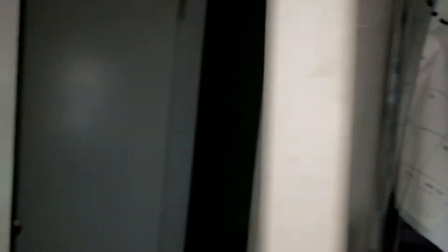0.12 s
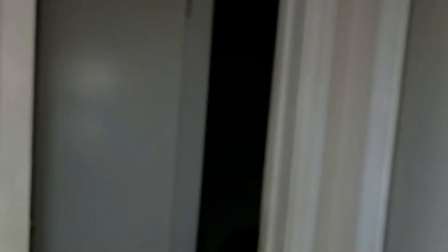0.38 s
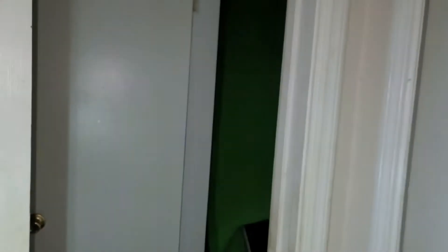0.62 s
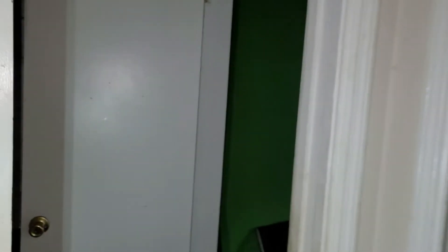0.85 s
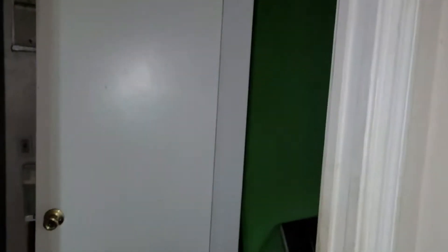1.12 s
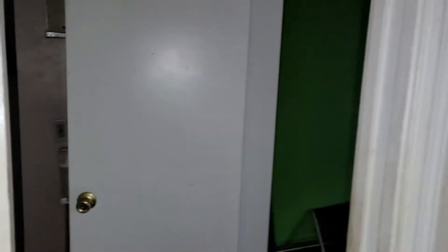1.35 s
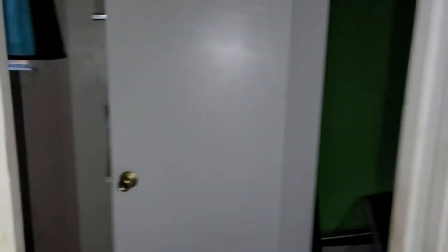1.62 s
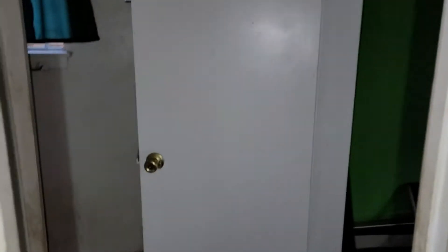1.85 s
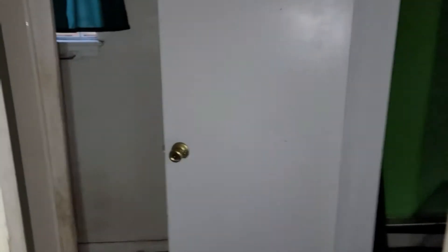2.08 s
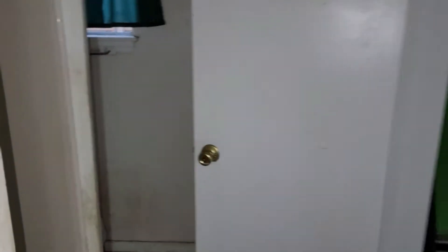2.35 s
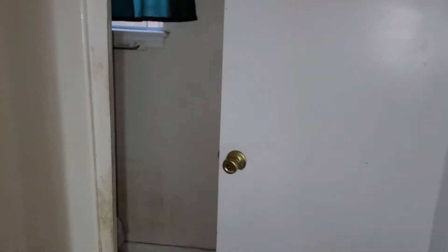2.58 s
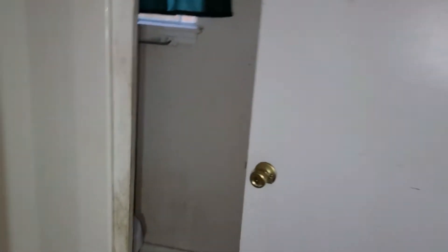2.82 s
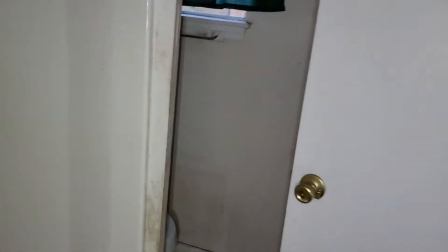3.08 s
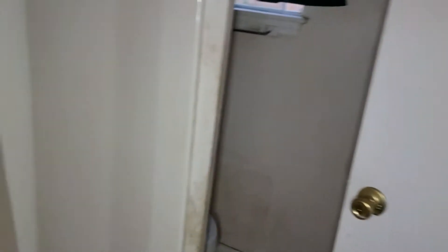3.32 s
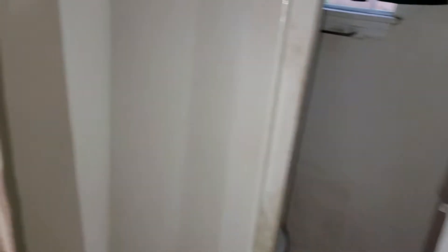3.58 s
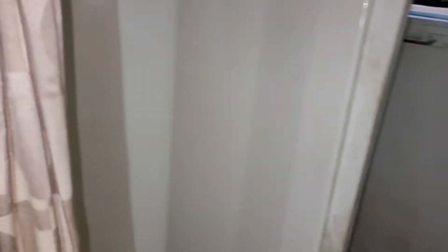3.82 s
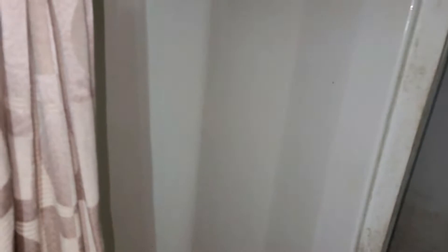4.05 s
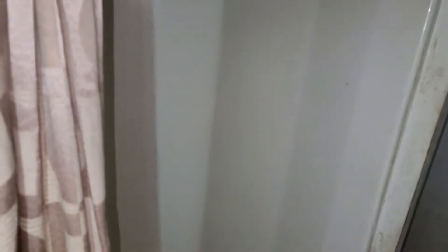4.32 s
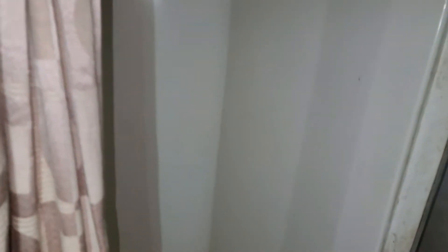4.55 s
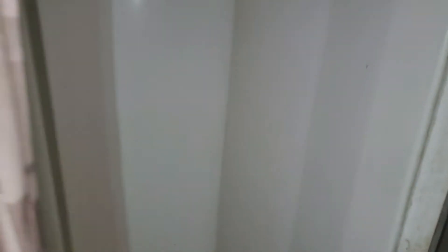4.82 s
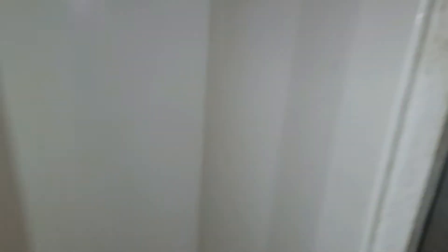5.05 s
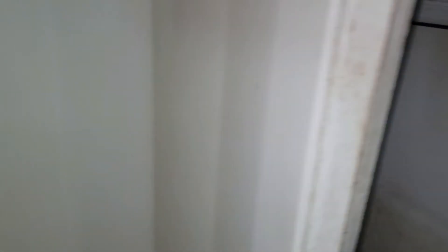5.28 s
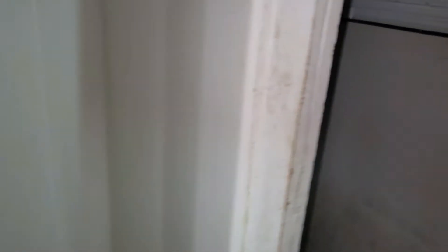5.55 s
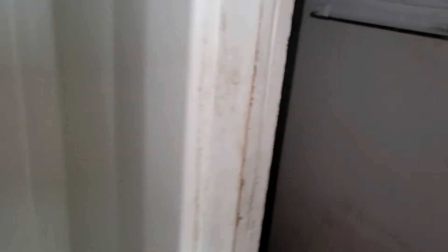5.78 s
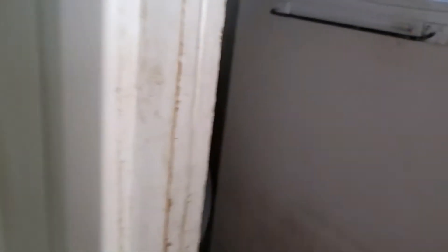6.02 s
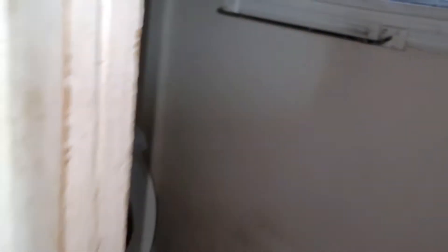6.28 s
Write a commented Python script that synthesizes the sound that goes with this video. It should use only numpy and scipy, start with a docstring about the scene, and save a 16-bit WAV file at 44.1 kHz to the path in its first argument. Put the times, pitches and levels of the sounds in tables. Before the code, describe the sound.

In small, hard-walled empty rooms, a quiet low mains hum sits under soft sole scuffs and crisp ticks. A hollow door gives a deep, soft boom early on. Light steps and rustling follow as the hum fades. After a near-quiet lull, one violent wooden heel thump with a sharp crack dominates, ringing briefly, then a smaller cluster of knocks. Close stereo handheld microphone.

```python
"""Small bare rooms: someone walks through, heels thump the boards, soles scuff and tick, a door panel booms.
Boards and door are banks of dying sines driven by short pushes; ticks are filtered clicks with grit.
Clothes, soles, rumble and room tone are shaped noise; squeaks are wavering sines; hum is two sines.
The hum fades as the appliance is left behind, and hard walls ring briefly after thumps and ticks."""
import sys
import numpy as np
from scipy import signal
from scipy.fft import rfft, irfft
from scipy.io import wavfile
from scipy.ndimage import uniform_filter1d

SR = 44100
rng = np.random.default_rng(int(sys.argv[2]) if len(sys.argv) > 2 else 0)


def natural_amplitude(level_db):
    """Convert a level in decibels to a linear amplitude factor, elementwise."""
    exponent = np.asarray(level_db, float) / 20
    return 10 ** exponent


def transcribe(u):
    """Save the signal u as a 16-bit wav file named by the first command-line argument.

    u: samples, shape (n,) or (channels, n), limited to [-1, 1]; the rate is SR.
    q: integer samples, one column per channel.
    """
    v = np.clip(np.atleast_2d(u).T, -1, 1)
    q = np.round(v * 32767).astype(np.int16)
    wavfile.write(sys.argv[1], SR, q)


N = 282240  # samples, 6.4 s

# appliance hum, nearest early on, then left behind: start_s, level_db (rms of the fundamental)
HUM_LEVEL = [(0, -51), (1.5, -46.5), (2.8, -50.5), (3.6, -55), (4.0, -62), (4.4, -58), (4.8, -69.5),
             (6.4, -62)]
# spectrum of the low rumble: freq_hz, density_db (relative, per Hz)
RUMBLE_COLOUR = [(15, -0.5), (35, 8.5), (60, 13.5), (100, -28.5), (160, -44.5), (300, -42.5)]
# house structure rumbling as the walker shifts weight: peak_s, length_s, peak_db (rms at the peak)
SWAYS = [(0, .6, -57), (0.823, .7, -50), (1.45, .8, -53.5), (2.898, .8, -51), (3.295, .4, -62),
         (3.635, .4, -47.5), (4.6, .9, -55), (5.25, .8, -59.5), (6.4, .7, -44)]
# spectrum of the quiet room tone: freq_hz, density_db (relative, per Hz)
TONE_COLOUR = [(47, -33), (80, 5), (152, -11), (227, -6.5), (378, -15.5), (687, -9), (958, -15.5),
               (1490, -14.5), (2490, -25), (6590, -33), (16000, -64)]
# likeness of left and right in diffuse sound: freq_hz, correlation (-1 to 1)
LIKENESS = [(60, .98), (170, .95), (350, .4), (700, -.3), (1400, -.35), (3000, -.05), (8000, .05)]
# how long hard walls ring: freq_hz, t60_s
WALLS = [(60, .4), (250, 0.47), (1000, 0.28), (3000, 0.28), (6000, 0.25), (10000, 0.28), (15000, 0.1)]
# faint short squeaks and rings: start_s, length_s, pitch_hz, level_db (3 dB above the plain sine's peak)
SQUEAKS = [(0.489, 0.27, 747, -55), (1.257, 0.048, 3150, -46.5), (3.472, 0.033, 2500, -43),
           (4.218, .11, 1880, -58), (4.712, 0.026, 2320, -43), (4.713, 0.039, 3950, -54.5),
           (6.066, 0.048, 1650, -32)]
# spectrum of brushing cloth and soles: freq_hz, density_db (relative, per Hz)
SCUFF_COLOUR = [(71, -37), (120, -16.5), (256, -7), (284, -10.5), (454, -6), (503, -5.5), (670, -5.5),
                (1120, -7.5), (1830, -11.5), (2240, -15), (6240, -29), (16000, -60.5)]
# clothes rustling with the pace of the walk: start_s, level_db (before tilt and flicker)
RUSTLE = [(0, -56), (1.25, -60.5), (1.95, -61.5), (2.45, -67), (3.05, -61), (3.42, -62), (3.8, -62.5),
          (4.3, -79), (4.9, -58.5), (5.42, -77), (5.9, -64.5), (6.4, -54)]
# soles dragging on the floor: peak_s, length_s, peak_db (before tilt and flicker), tilt_db (per octave)
SCUFFS = [(0.133, 0.38, -54, -1.5), (0.317, 0.2, -49, 0.7), (0.889, 0.15, -47, -3), (1.12, 0.38, -52, 1.2),
          (1.581, 0.15, -49.5, 2.5), (2.123, 0.2, -57, 3.5), (2.686, 0.21, -57.5, 1.5),
          (2.84, 0.1, -53.5, -0.5), (3.15, 0.19, -55.5, -3), (3.494, 0.041, -51.5, -1),
          (3.522, 0.078, -48.5, -3), (3.594, 0.15, -41, -0.5), (3.622, 0.044, -41, 0.9),
          (4.516, 0.1, -61, -3.5), (4.59, 0.18, -56, 3.5), (5.22, 0.38, -58, 1.5),
          (5.49, 0.063, -56.5, 1.5), (6.176, 0.076, -45.5, -7.5), (6.31, 0.058, -43.5, -4.8),
          (6.38, 0.21, -59.5, -8)]
# sole slaps, grit and latch ticks: start_s, peak_db (touch before panning), centre_hz,
# spread_octaves (upward), room_db (send relative to the touch)
TICKS = [(0.1633, -36.5, 2190, 1.36, 10), (0.473, -43.5, 5870, 0.47, -15),
         (0.5853, -23.5, 5000, 0.47, -2.5), (0.594, -41, 7000, 1, -10.5), (0.8333, -22.5, 5000, 0.85, -1.5),
         (1.08, -37, 3000, 1, 0.1), (1.167, -46, 4230, 1.4, 5.5), (1.261, -47, 3160, 0.72, 5),
         (1.319, -36.5, 2910, 1.2, 1.5), (1.553, -39.5, 2600, 1.32, 12), (1.703, -45.5, 2350, 1.4, 14),
         (1.8144, -34.5, 3000, 1.4, 5.5), (2.054, -49.5, 3890, 0.88, 6), (2.842, -45.5, 2210, 1.4, 0.1),
         (2.942, -42.5, 4800, 0.77, -3), (3.037, -37.5, 4170, 0.93, 6.5), (3.1573, -39.5, 4020, 0.91, 3.5),
         (3.481, -56, 2700, 1.3, 6), (3.723, -23.5, 2550, 1, -0.8), (4.18, -58.5, 8000, 0.36, -11),
         (4.281, -47, 7300, 0.34, -1.5), (4.366, -70, 6500, 0.63, 0), (4.713, -41, 2100, 0.57, -1.5),
         (4.942, -37.5, 1390, 0.66, 7.5), (5.017, -9, 2520, 1.17, 6), (5.0188, -13.5, 2830, 0.77, -8),
         (5.1758, -42.5, 1380, .9, 5), (5.292, -52, 2280, 1.1, 1), (5.3539, -43, 5500, 0.96, 3.5),
         (5.9405, -41, 2450, 1.5, -0.5), (6.066, -29, 1480, 0.77, -0.5), (6.1423, -49.5, 2730, 1.08, 15.5),
         (6.1635, -39.5, 785, 1.34, -8), (6.197, -34, 6000, 0.66, -1), (6.2895, -37, 1990, 1.04, 13),
         (6.304, -42, 3000, 0.29, 3), (6.336, -37, 3600, 0.72, 4)]
# small stiff parts that colour the ticks: pitch_hz, width_hz, boost_db
TICK_RINGS = [(1583, 3300, 7.5), (2930, 570, 5.5), (5000, 1900, 2.5), (7000, 1100, 5.5), (11560, 600, 9.5)]
# heel blows on the boards: start_s, peak_db (before panning), centre_hz, spread_octaves, pan_db (left over right)
STEPS = [(0.166, -45, 829, 1.4, -12), (0.887, -35, 500, 0.69, 0.1), (0.905, -37, 420, 0.71, 6),
         (1.159, -43.5, 378, 0.71, 4), (1.552, -30, 229, 1.17, -4), (2.546, -54, 374, 0.63, 5),
         (2.673, -51, 307, 2.3, 0), (2.839, -39.5, 179, 1.9, 2), (3.161, -44.5, 475, 0.73, -4),
         (3.182, -44.5, 520, 0.5, 7), (3.497, -55, 703, 1.2, -2), (3.726, -32, 199, 1.6, 1),
         (4.528, -46, 285, 1.9, 2), (4.71, -52, 687, 1.1, 17), (4.802, -43.5, 420, 0.56, 2),
         (4.941, -12.5, 220, 1.47, 0.2), (4.951, -15, 201.6, 0.62, 4), (4.977, -28.5, 266, 0.97, 10),
         (5.018, -20, 150, 1.8, 2.5), (5.073, -39, 202, 2.3, 0), (6.066, -25.5, 268, 1.17, -0.5),
         (6.101, -36, 213, 1.5, -11), (6.159, -27.5, 350, 0.76, 2), (6.294, -32, 201, 0.56, 1)]
# body weight settling on the joists: start_s, peak_db, centre_hz
WEIGHT = [(0.596, -45, 51.7), (0.779, -51, 55.6), (2.899, -44, 60.4), (3.599, -48, 40), (3.719, -40, 45.7),
          (4.951, -20.5, 46), (5.028, -22.5, 60), (6.074, -26.5, 45.3), (6.122, -35, 41.8),
          (6.289, -40, 45)]
# modes of the boards: pitch_hz (before detuning), level_db, t60_s
BOARDS = [(27.7, -10, 0.26), (37.1, -2.5, 0.062), (49.5, -11, 0.17), (67, -46.5, .37), (94.6, -2.5, .25),
          (151, -4, 0.12), (163, -8, 0.14), (199, 6, 0.098), (244.3, -5, 0.13), (285, -1.6, .1),
          (350, -2.5, 0.062), (419.5, -6.5, 0.16), (481.4, -10.5, 0.19), (571, -3, 0.056),
          (675, -1.5, 0.097), (761, 2, 0.057), (862.6, -8, 0.29), (943, 3.5, 0.019), (1184, -8, 0.03),
          (1260, -1, 0.11), (1480, 10.5, .04), (1650, -18, .04), (1880, -14.5, .04)]
# soft push on the hollow door: start_s, peak_db, contact_ms
DOOR_BUMP = (1.541, -10, 7.7)
# modes of the door leaf: pitch_hz, level_db, t60_s
DOOR = [(60.5, 0, .4), (73.5, -4, .3), (92, -10, .15), (135, -20, .2), (172, -10, .2), (221, -8, .2),
        (296, -18, .3), (382, -12, .3), (490, -14, .3), (587, -12, .3)]


def evened(x):
    """Scales to rms 1."""
    return x / np.sqrt(np.mean(x ** 2) + 1e-20)


def read(points, hz):
    """Reads a spectrum table on a log-frequency axis."""
    f, value = np.transpose(points)
    return np.interp(np.log(hz + 1), np.log(f + 1), value)


def curve(rows, t):
    """Reads a time curve."""
    return np.interp(t, *np.transpose(rows))


def swell(t, s, length, db):
    """Power of a movement that peaks at s and is 12 dB down at both ends of its length."""
    rise_share, bend = 0.45, 1.42  # part of the length spent rising; roundness of the top
    way = (t - s) / length / np.where(t < s, rise_share, 1 - rise_share)
    return natural_amplitude(2 * (db - 12 * abs(way) ** bend))


def add(mix, s, sound):
    """Mixes a sound in at time s."""
    part = mix[..., round(s * SR):][..., :sound.shape[-1]]
    part += sound[..., :part.shape[-1]]


def sides(pan_db):
    """Gains for left and right."""
    return natural_amplitude(np.array([[pan_db / 2], [-pan_db / 2]]))


def diffuse(db_of, size, count=N):
    """Two-channel noise shaped by db_of(Hz, s), left and right as alike as in the sound field."""
    hop = size // 4
    frames = count // hop + 5
    hz = np.fft.rfftfreq(size, 1 / SR)[:, None]
    a, b, c, d = rng.standard_normal((frames, len(hz), 4)).T
    same = np.clip(read(LIKENESS, hz), -1, 1)
    left, other = a + 1j * b, c + 1j * d
    spectra = np.array([left, same * left + np.sqrt(1 - same ** 2) * other])
    spectra *= natural_amplitude(db_of(hz, np.arange(frames) * hop / SR))
    return signal.istft(spectra, nperseg=size, noverlap=size - hop)[1][:, :count]


def steady(colour, size, count=N):
    """Diffuse noise of one unchanging colour."""
    return diffuse(lambda hz, s: read(colour, hz) + 0 * s, size, count)


def room(x, low_hz):
    """Dense reflections from hard walls, each band dying at its own speed, weaker below low_hz."""
    def decay_db(hz, s):
        """Decay of each band, with the low end rolled off."""
        return -60 * s / read(WALLS, hz) - 10 * np.log10(1 + (low_hz / (hz + 1)) ** 2)

    t, out = np.arange(N) / SR, np.zeros((2, N))
    build_up = 1 - np.exp(-np.arange(SR // 2) / SR / 0.0013)
    for k in range(3):  # three tails take turns
        tail = diffuse(decay_db, 256, count=SR // 2) * build_up
        turn = np.sqrt(2 / 3) * np.cos(2 * np.pi * (3.1 * t + k / 3))
        out += signal.fftconvolve((x * turn)[None], tail / np.linalg.norm(tail[0]), axes=1)[:, :N]
    return out


def ports(x, lead_ms):
    """Direct sound reaches the right microphone port first, the left one lead_ms later."""
    return np.array([np.roll(x[0], round(lead_ms * SR / 1000)), x[1]])


def ring(modes, centre_hz, spread, detune):
    """Dying sines, weighted by a bell over log frequency where the blow puts its energy."""
    hz, db, t60 = np.transpose(modes)[:, :, None]
    t = np.arange(round(1.2 * t60.max() * SR)) / SR
    bell_db = -6 * (np.log2(hz / centre_hz) / max(spread, .2)) ** 2
    side = (-1.) ** np.arange(len(modes))[:, None]  # neighbouring modes start in opposite directions
    decay = natural_amplitude(db + bell_db - 60 * t / t60)
    return (side * decay * np.sin(2 * np.pi * hz * detune * t)).sum(0)


def struck(body, contact_ms, db):
    """A push that peaks a quarter of the contact time in, then relaxes, drives the body."""
    u = np.linspace(0, 8, max(round(2 * contact_ms * SR / 1000), 2))
    sound = signal.fftconvolve(body, u * np.exp(-u))
    return natural_amplitude(db) * sound / abs(sound).max()


def room_tone():
    """Quiet steady noise of the rooms at a fixed rms level."""
    return natural_amplitude(-58) * evened(steady(TONE_COLOUR, 1024))


def hum():
    """Mains hum: a 60 Hz sine and its weaker octave, both following the distance."""
    t = np.arange(N) / SR
    turn = 2 * np.pi * 60 * t
    return np.sqrt(2) * natural_amplitude(curve(HUM_LEVEL, t)) * (np.cos(turn) + natural_amplitude(-21.5) * np.sin(2 * turn))


def rumble():
    """Low structure noise at a resting level, swelling with each shift of weight."""
    rest_db = -59.5
    t = np.arange(N) / SR
    load = np.sqrt(natural_amplitude(2 * rest_db) + sum(swell(t, *row) for row in SWAYS))
    return load * evened(steady(RUMBLE_COLOUR, 2048))


def squeaks():
    """Brief, rough, unsteady tones that start quickly and fade as surfaces stick and slip."""
    dry = np.zeros(N)
    draws = rng.standard_normal((len(SQUEAKS), 2, SR // 4))
    for (s, length, hz, db), (slow, fast) in zip(SQUEAKS, draws):
        waver = 1 + 0.22 * uniform_filter1d(slow, 150)[:round(length * SR)]
        u = np.linspace(0, 1, len(waver))
        rough = evened(uniform_filter1d(uniform_filter1d(fast, size=80), size=80))
        chatter = 1 + 0.47 * rough[:len(u)]  # stick and slip
        tone = np.sin(2 * np.pi * np.cumsum(hz * waver) / SR)
        fade = np.minimum(u / 0.066, 1) * (1 - u)
        add(dry, s, natural_amplitude(db - 3) * chatter * tone * fade)
    return ports(np.array([dry, dry]), lead_ms=0.25)


def rustle_and_scuffs():
    """Brushing noise of clothes and dragged soles, in uneven rubs with gritty flicker."""
    rustle_tilt_db, rub_db, grit_db = 1.06, 1, 3  # tilt per octave
    grit = uniform_filter1d(np.minimum(rng.exponential(size=N // 64 + 5), 3.2) - 1, 2)
    rubs = evened(uniform_filter1d(rng.standard_normal(len(grit)), size=9))
    unit = np.std(steady(SCUFF_COLOUR, 256, count=SR))

    def field(hz, s):
        """Colour, tilt about 1.4 kHz, level and grit."""
        octaves = np.log2((hz + 100) / 1500)
        power = natural_amplitude(2 * (curve(RUSTLE, s) + rustle_tilt_db * octaves))
        for at, length, db, tilt_db in SCUFFS:
            power = power + swell(s, at, length, db) * natural_amplitude(2 * tilt_db * octaves)
        return read(SCUFF_COLOUR, hz) + 10 * np.log10(power) + rub_db * rubs + grit_db * grit

    return diffuse(field, 256) / unit


def ticks():
    """Short hard contacts: a firm touch and a spray of grit, coloured by the blow and small stiff parts."""
    downward = 1.24  # a tick spreads further down than up
    firm_db, deeper_per_db = -24, 1.5  # firmer blows reach deeper, octaves per dB
    dry, send = np.zeros((2, N)), np.zeros(N)
    hz = np.fft.rfftfreq(1024, 1 / SR) + 1
    grit_fade = natural_amplitude(-60 * np.arange(1024) / SR / 0.02)
    rings_db = sum(db / (1 + (2 * (hz - f) / width) ** 2) for f, width, db in TICK_RINGS)
    draws = rng.standard_normal((len(TICKS), 2, 1024))
    for (s, db, centre_hz, above, room_db), draw in zip(TICKS, draws):
        grit = natural_amplitude(-13.5) * draw * grit_fade  # scatters differently to each port
        below = downward * above + deeper_per_db * max(db - firm_db, 0)
        octaves = np.log2(hz / centre_hz) / np.where(hz > centre_hz, above, below)
        log_gain = np.log(natural_amplitude(np.maximum(rings_db - 6 * octaves ** 2, -60)))
        full = np.r_[log_gain, log_gain[-2:0:-1]]
        # minimum phase: nothing sounds before the touch
        causal = np.exp(np.conj(signal.hilbert(full)))[:len(hz)]
        touch = irfft(causal)
        gain = natural_amplitude(db) / abs(touch).max()
        add(dry, s, gain * (touch + irfft(rfft(grit) * causal)))
        add(send, s, gain * natural_amplitude(room_db) * touch)
    return ports(sides(-2.5) * dry, lead_ms=0.25) + room(send, low_hz=350)


def door_boom():
    """A soft push sets the modes of a hollow door leaf ringing."""
    dry = np.zeros(N)
    s, db, contact_ms = DOOR_BUMP
    panel = ring(DOOR, 100, 11.0, 1)
    panel *= 1 - np.exp(-np.arange(len(panel)) / SR / .028)  # the boom swells slowly as a room mode builds up
    add(dry, s, struck(panel, contact_ms, db))
    return dry


def heels():
    """Sharp heel blows and slow settling weight ring the modes of the boards."""
    dry = np.zeros((2, N))
    draws = rng.standard_normal((len(STEPS), len(BOARDS), 1))
    for (s, db, hz, spread, pan_db), vary in zip(STEPS, draws):
        boards = ring(BOARDS, hz, spread, 1 + 0.012 * vary)  # each blow detunes each mode a little
        add(dry, s, sides(pan_db) * struck(boards, 0.42, db))
    for s, db, hz in WEIGHT:
        add(dry, s, struck(ring(BOARDS, hz, 0.56, 0.91), 8.2, db)[None])
    return dry


def thumps():
    """Heels and door, heard directly and through the ringing of the walls."""
    boards, door = heels(), door_boom()
    send = natural_amplitude(-3.5) * boards.mean(0) + natural_amplitude(-11) * door
    return ports(boards + door, lead_ms=0.35) + room(send, low_hz=204)


def scene():
    """All sources, from the background to the footsteps."""
    background = room_tone() + hum() + rumble()
    return background + squeaks() + rustle_and_scuffs() + ticks() + thumps()


def band_limit(x):
    """A steep low-pass at the top of the band."""
    return signal.sosfilt(signal.butter(12, 15880, fs=SR, output="sos"), x)


def record(dry):
    """Passes on the finished mix."""
    return band_limit(dry)


dry = scene()
out = record(dry)
transcribe(out)
```